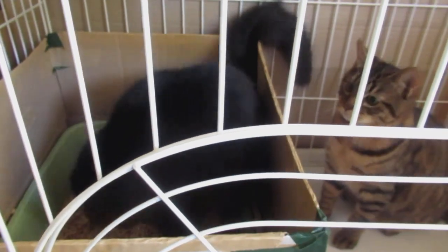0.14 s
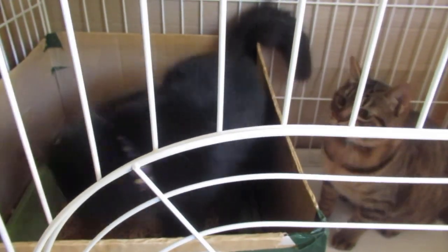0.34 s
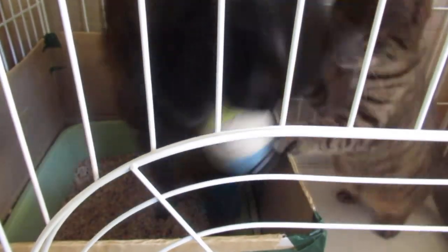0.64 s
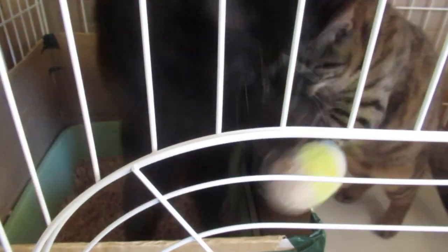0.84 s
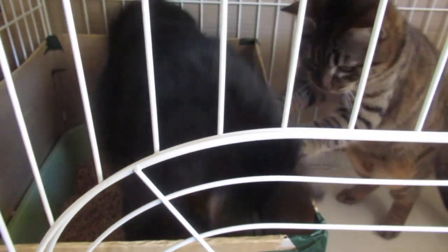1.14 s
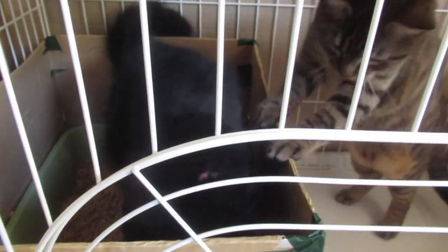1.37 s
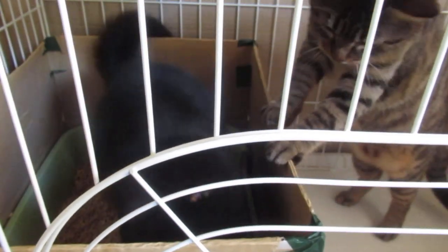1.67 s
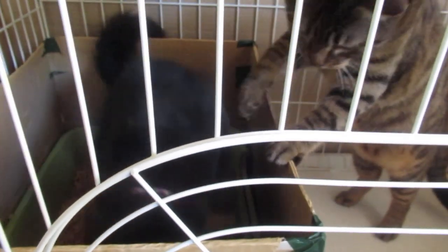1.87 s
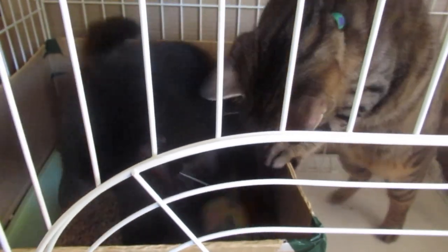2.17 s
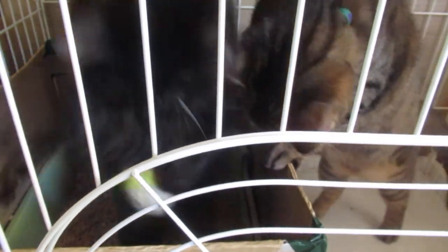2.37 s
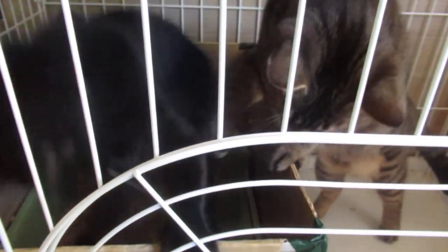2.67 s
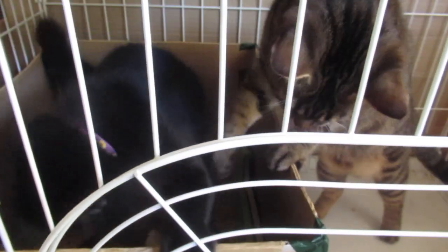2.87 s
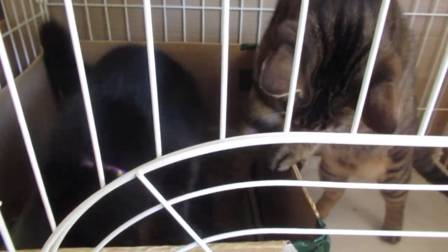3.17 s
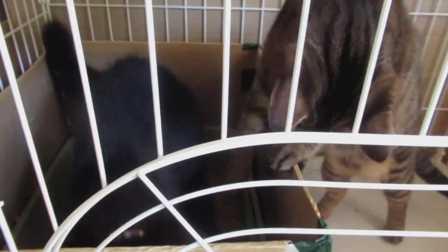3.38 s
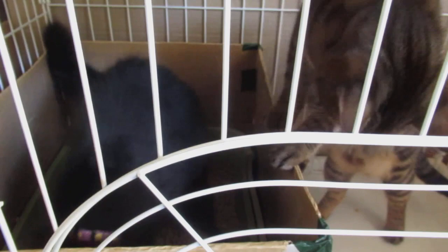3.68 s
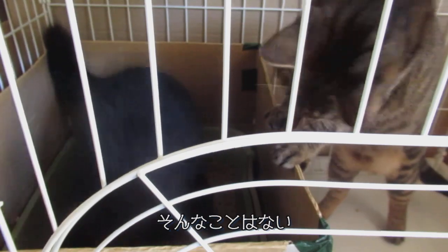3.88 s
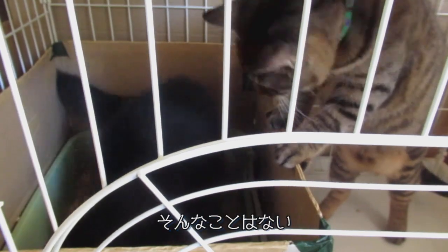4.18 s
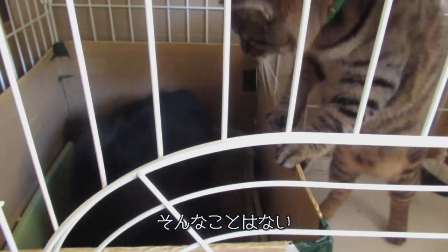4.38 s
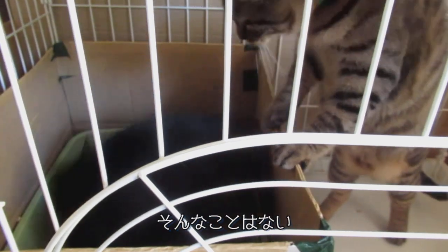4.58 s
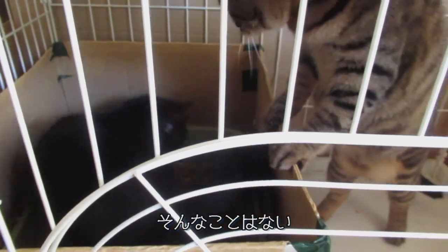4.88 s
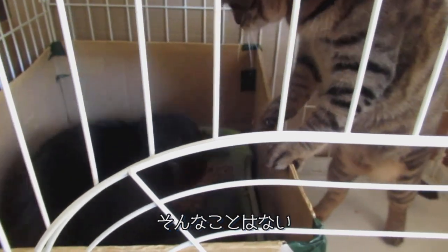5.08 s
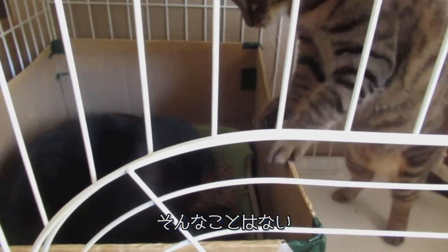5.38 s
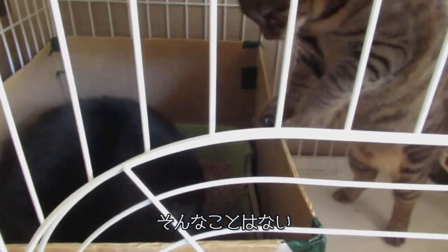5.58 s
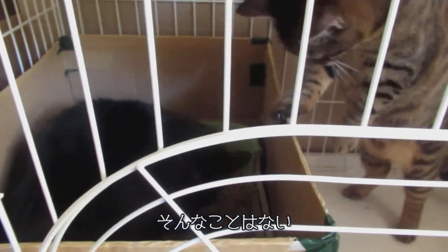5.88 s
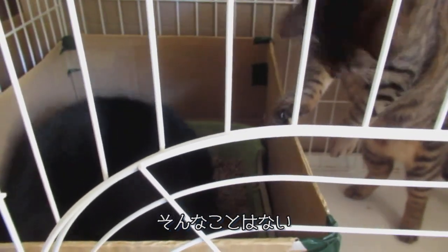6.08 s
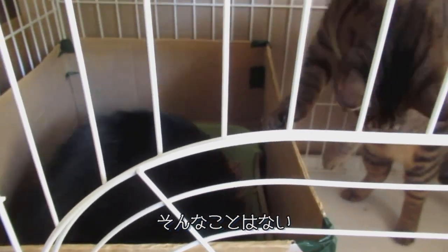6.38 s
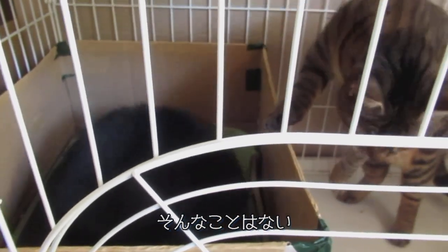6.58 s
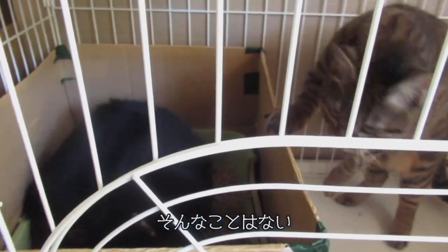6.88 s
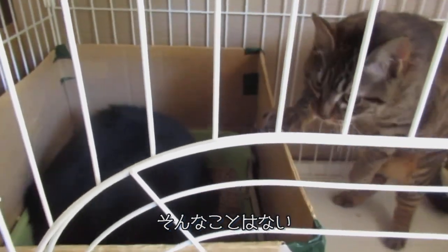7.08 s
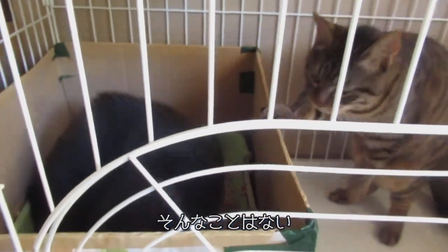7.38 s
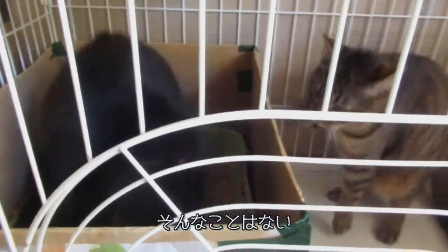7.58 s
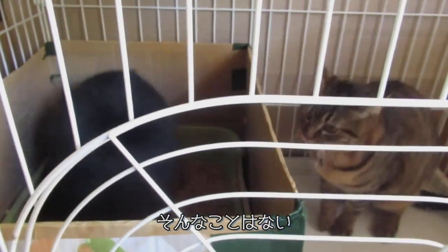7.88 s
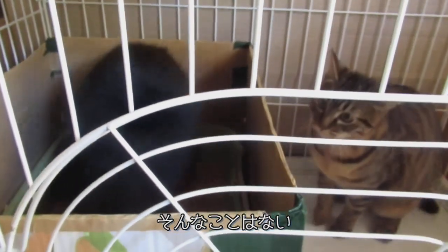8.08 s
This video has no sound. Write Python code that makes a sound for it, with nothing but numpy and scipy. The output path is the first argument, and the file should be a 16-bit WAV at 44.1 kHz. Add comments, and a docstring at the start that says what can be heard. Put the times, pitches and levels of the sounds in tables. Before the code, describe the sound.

A kitten digs in a plastic litter tray inside a cardboard box, heard close in a small, quiet room. For the first second, quick paw strokes rustle and crunch dry pellets, with dull rubbing on cardboard. A soft bump and a single crunch follow around 1.5 seconds. From 2 to 3.2 seconds, a paw or toy ball knocks the box several times with brief, hollow booms among scattered crunches. After a lull, a thump at 4 seconds starts the longest flurry of crunching and scratching, lasting until just after 5 seconds. Soft shuffling follows, then a short scratch from 6.5 to 6.9 seconds. Digging resumes at 7.7 seconds and ends in the loudest, sharpest crunch at about 8.2 seconds. Low room air and a faint appliance hum continue throughout, with barely audible, very high, thin squeaks near 0.3, 2.7 and 6.5 seconds.

```python
"""Crunching, rustling pellets: a kitten digs in a plastic litter tray in a cardboard box, in a quiet room.
Each paw stroke rolls the pellets, hisses over them and rubs the cardboard; pellets caught against the
tray crunch. Now and then a paw or a toy ball bumps the box, which booms briefly.
Behind it: room air, a faint appliance hum and a few thin, very high squeaks."""
import sys
import numpy as np
from scipy import signal
from scipy.fft import rfft, irfft
from scipy.io import wavfile
from scipy.ndimage import uniform_filter1d

SR = 44100
rng = np.random.default_rng(int(sys.argv[2]) if len(sys.argv) > 2 else 0)


def store_wav(level_fs):
    """Save 16-bit WAV to argv[1]."""
    pcm = np.round(np.clip(np.atleast_2d(level_fs), -1, 1) * 32767)
    wavfile.write(sys.argv[1], SR, pcm.T.astype(np.int16))


N = 363384


def amp(db):
    return 10 ** (np.asarray(db) / 20)


def unit_rms(x):
    return x / np.sqrt(np.mean(x ** 2) + 1e-20)


def curve(points, hz):
    """Interpolate (freq_hz, value) points over log frequency."""
    freq_hz, value = np.transpose(points)
    return np.interp(np.log(hz + 1), np.log(freq_hz + 1), value)


def add(mix, start_s, sound):
    part = mix[max(round(start_s * SR), 0):][:len(sound)]
    part += sound[:len(part)]


def bins_hz(size):
    return np.fft.rfftfreq(size, 1 / SR)


def colour(x, gain_db):
    """Minimum-phase filter: rings after its cause, never before."""
    log_gain = np.log(amp(np.maximum(gain_db, -100)))
    mirrored = np.r_[log_gain, log_gain[-2:0:-1]]
    taps = np.fft.ifft(np.exp(np.conj(signal.hilbert(mirrored)))).real
    return signal.oaconvolve(x, taps[:len(log_gain)])[:len(x)]


def hump(hz, centre_hz, width_hz):
    return 1 / (1 + (2 * (hz - centre_hz) / width_hz) ** 2)


def clicks(size, per_s, spread_db):
    """Random impulses, exponentially spread in level."""
    hit = rng.random(size) < per_s / SR
    height = np.minimum(rng.exponential(1, size), 4)
    return hit * rng.choice([-1, 1], size) * amp(spread_db * height)


def room_air(level_db=-55):
    """Steady, bass-heavy noise of a still room."""
    # air spectrum: freq_hz, gain_db
    spectrum = [(15, -17), (28, -10), (42, 4), (62, -8), (110, -1), (150, -5.5), (190, -10.5), (270, -7),
                (420, -6), (700, -16), (1500, -16), (4000, -25.5), (10000, -27.5), (15000, -35.5)]
    white = rfft(rng.standard_normal(N))
    return amp(level_db) * unit_rms(irfft(white * amp(curve(spectrum, bins_hz(N))), N))


def appliance_hum(drone_hz=84, drone_width_hz=7, drone_gain_db=2):
    """Wavering tones of narrow-band noise; the lowest swells and fades."""
    # upper tones: pitch_hz, level_db, width_hz
    tones = [(232, -67.5, 14), (292, -68.5, 26), (636, -82, 35), (1817, -72, 12)]
    # swell of the lowest tone: time_s, relative_db
    swell = [(0, -66), (2.2, -62.5), (2.9, -58), (4.5, -65), (5.7, -64.5), (6.2, -53.5), (7.7, -60),
             (8.24, -71)]
    hz = bins_hz(N)
    white = rfft(rng.standard_normal(N))
    hum = sum(amp(db) * unit_rms(irfft(white * hump(hz, f, width), N)) for f, db, width in tones)
    drone = unit_rms(irfft(white * hump(hz, drone_hz, drone_width_hz), N))
    drone_db = drone_gain_db + np.interp(np.arange(N) / SR, *np.transpose(swell))
    return hum + amp(drone_db) * drone


def squeaks(level_db=-72, sag=0.13, width_hz=350):
    """Thin, fuzzy whistles; each rises and falls in pitch in one arch."""
    # whistles: centre_s, length_s, top_hz
    whistles = [(0.312, .21, 13350), (2.67, 0.16, 13000), (6.43, 0.12, 13650), (6.51, 0.1, 13300)]
    out = np.zeros(N)
    for centre_s, length_s, top_hz in whistles:
        u = np.linspace(-1, 1, int(length_s * SR))
        pitch_hz = top_hz * (1 - sag * np.abs(u) ** 1.5)
        tone = np.sin(2 * np.pi * np.cumsum(pitch_hz) / SR)
        waver = unit_rms(uniform_filter1d(rng.standard_normal(len(u)), int(SR / width_hz)))
        add(out, centre_s - length_s / 2, amp(level_db) * np.sqrt(1 - u ** 2) * waver * tone)
    return out


def room_reverb(x, predelay_s=1 / 120):
    """Small room: a diffuse tail whose treble dies first."""
    # room decay: freq_hz, t60_s
    decay = [(150, 0.2), (700, 0.15), (2000, 0.21), (5000, 0.064), (13000, 0.1)]
    hz, t, reflections = signal.stft(clicks(SR // 2, per_s=3600, spread_db=1), SR, nperseg=256)
    fade = amp(-60 * t / curve(decay, hz)[:, None])
    _, tail = signal.istft(reflections * fade, SR, nperseg=256)
    tail = np.r_[np.zeros(int(predelay_s * SR)), tail]
    return signal.fftconvolve(x, tail / np.linalg.norm(tail))[:N]


def paw_envelopes(rise_share=0.43, swell_power=1.35, shuffle_hiss_db=-10, shuffle_rub_db=-16):
    """Rustle, hiss and rub gains: each stroke swells and falls over slow shuffling."""
    # kitten shifting its weight: time_s, rustle_db
    shuffle = [(0, -57.5), (1.15, -56), (1.85, -62), (2.4, -60.5), (2.85, -53.5), (3.25, -62.5),
               (4.0, -55.5), (4.5, -47), (5.25, -60), (6.3, -58.5), (6.65, -53), (7.1, -59), (8.24, -52.5)]
    # paw strokes: peak_s, length_s, rustle_db, hiss_db, rub_db
    strokes = [(.092, 0.02, -47, -75, -62), (0.294, 0.024, -48, -79, -49), (0.176, 0.024, -34, -55, -46),
               (0.242, 0.015, -33.5, -73, -42), (0.444, 0.024, -44.5, -72, -46),
               (0.531, 0.014, -53, -66, -44.5), (0.613, 0.042, -41, -64, -45),
               (0.668, 0.028, -43.5, -52.5, -39.5), (0.76, 0.03, -46.5, -50, -42),
               (0.84, 0.083, -41.5, -46, -38.5), (0.957, 0.17, -51.5, -66, -55.5),
               (1.48, 0.062, -53, -60, -63), (1.624, 0.039, -49, -48, -45.5),
               (2.16, 0.11, -55.5, -59.5, -57), (2.546, 0.03, -48, -59, -47),
               (2.632, 0.026, -58, -54, -37.5), (2.695, 0.032, -36.5, -56.5, -40),
               (2.76, 0.078, -46, -61, -51), (3.179, 0.019, -42, -46.5, -43),
               (3.202, 0.017, -39.5, -43.5, -48), (4.006, .09, -51, -55, -55),
               (4.085, 0.053, -32, -56, -49), (4.238, 0.042, -30.5, -45, -46),
               (4.323, .05, -39.5, -58, -67), (4.377, .05, -46, -58, -66), (4.466, 0.024, -39, -57, -62),
               (4.594, 0.085, -39.5, -67, -49), (4.751, 0.036, -37.5, -70, -46.5),
               (4.853, 0.059, -39.5, -56, -56), (4.997, 0.068, -39, -56, -66),
               (5.088, 0.013, -38, -67, -66), (5.419, 0.026, -50, -56, -53), (5.772, 0.088, -54, -57, -71),
               (6.037, 0.031, -52, -63, -49), (6.527, 0.024, -38.5, -50.5, -55),
               (6.602, 0.049, -43, -68, -73), (6.795, 0.086, -59, -74, -51.5),
               (6.852, 0.023, -42.5, -50, -49), (6.888, 0.033, -32, -56, -64),
               (7.67, 0.041, -47, -54.5, -50.5), (7.753, 0.038, -34.5, -49.5, -45),
               (7.83, 0.077, -47.5, -65, -49), (7.922, 0.039, -45, -75, -44), (8.02, 0.11, -48, -61.5, -47),
               (8.187, 0.056, -39.5, -50, -67)]
    t = np.arange(0, N + 50, 50) / SR
    shuffle_db = np.interp(t, *np.transpose(shuffle))
    power = amp(shuffle_db + np.c_[[0, shuffle_hiss_db, shuffle_rub_db]]) ** 2
    for peak_s, length_s, *levels_db in strokes:
        reach_s = length_s * np.where(t < peak_s, rise_share, 1 - rise_share)
        swell = np.exp(-np.abs((t - peak_s) / reach_s) ** swell_power)
        power += amp(np.c_[levels_db]) ** 2 * swell
    return [np.interp(np.arange(N) / SR, t, np.sqrt(p)) for p in power]


def cardboard_rub(rub_gain):
    """The kitten slides along the cardboard, which rumbles dully."""
    # cardboard response: freq_hz, gain_db
    spectrum = [(30, -13), (70, -0.5), (130, -3), (200, -2), (300, -1.5), (450, -3), (700, -16),
                (2000, -55), (15000, -97)]
    return rub_gain * unit_rms(colour(rng.standard_normal(N), curve(spectrum, bins_hz(8192))))


def box_bumps(spread_octaves=0.86, rise_s=0.0014, leak_hz=45):
    """Soft blows wake the box modes near their centre; the deepest bass is cut away."""
    # blows: start_s, level_db, centre_hz
    blows = [(0.658, -48, 90), (0.839, -40.5, 100), (1.503, -40, 85), (2.093, -40.5, 380),
             (2.115, -40.5, 94), (2.22, -50, 350), (2.288, -48.5, 280), (2.511, -32, 348),
             (2.517, -30.5, 61.7), (2.624, -38, 57.6), (2.662, -45, 48), (3.2, -37.5, 420),
             (3.212, -52, 85), (4.039, -29, 126), (5.334, -46.5, 151)]
    # cardboard box modes: freq_hz, gain_db, t60_s
    modes = [(42, 7.5, 0.26), (75.6, 1, 0.15), (85.4, 7.5, 0.11), (106.5, 4.5, 0.1), (137, 0.5, 0.11),
             (171, -7, 0.22), (210, -7, 0.033), (249, -6, 0.13), (287, -1, 0.097), (323, 3, 0.062),
             (395, -1, 0.097), (458, 8, 0.061)]
    t, out = np.arange(SR // 2) / SR, np.zeros(N)
    hz, gain_db, t60_s = np.transpose(modes)[:, :, None]
    leak = signal.butter(2, leak_hz, "high", fs=SR)
    for start_s, level_db, centre_hz in blows:
        detune, phase = rng.random((2, len(modes), 1))
        tuned_hz = hz * (1 + 0.04 * (detune - 0.5))
        weight = np.exp(-0.5 * (np.log2(hz / centre_hz) / spread_octaves) ** 2)
        rings = weight * amp(gain_db - 60 * t / t60_s) * np.sin(2 * np.pi * (tuned_hz * t + phase))
        boom = signal.lfilter(*leak, rings.sum(0) * (1 - np.exp(-t / rise_s)))
        onset_rms = np.sqrt(np.mean(boom[:SR // 50] ** 2))
        add(out, start_s, amp(level_db) * boom / onset_rms)
    return out


def tray_db(hz):
    """The plastic tray colours the pellets' sound with its resonances."""
    # peaks and dips: centre_hz, width_hz, gain_db
    resonances = [(270.4, 57, 12.5), (604, 110, 4.5), (826, 340, 2), (1125, 75, 3), (1255, 32, 3),
                  (2070, 320, -2), (2940, 66, -2.5)]
    return sum(db * hump(hz, f, width) for f, width, db in resonances)


def pellet_drag(rustle_gain, hiss_gain, hiss_db=-2, tick_db=-3, slip_db=2):
    """Pellets roll over each other in uneven slips; strays tick against the plastic."""
    # rolling pellets: freq_hz, gain_db
    rustle_eq = [(60, -17), (160, -6), (300, -8), (480, -5), (660, 4), (1000, 1.5), (1600, -1.5),
                 (2800, -7), (4200, -21), (9000, -42), (15000, -49)]
    # paw brushing the pellets: freq_hz, gain_db
    hiss_eq = [(1500, -26), (3000, 1.5), (4500, 0), (8000, -2), (12000, -9), (15000, -16)]
    # stray pellets on plastic: freq_hz, gain_db
    tick_eq = [(300, -25), (1200, 3), (3200, 0.5), (8000, -5), (15000, -12)]
    hz = bins_hz(2048)
    drift = uniform_filter1d(uniform_filter1d(rng.standard_normal(N), 400), 200)
    slips = amp(slip_db * unit_rms(drift))
    rustle = colour(clicks(N, per_s=1700, spread_db=0.5) * slips, curve(rustle_eq, hz) + tray_db(hz))
    hiss = colour(clicks(N, per_s=1700, spread_db=-1) * slips, curve(hiss_eq, hz))
    ticks = colour(clicks(N, per_s=170, spread_db=2.5), curve(tick_eq, hz))
    scratch = amp(hiss_db) * unit_rms(hiss) + amp(tick_db) * unit_rms(ticks)
    return rustle_gain * unit_rms(rustle) + hiss_gain * scratch


def pellet_cracks(lead_s, crumble_s, build_s=0.00074, lead_db=-6, snap=0.12, echo_db=-7, t60_s=0.091):
    """Pellets give way until one snaps; the rest crumble, and the box walls scatter the sound."""
    t = np.arange(SR // 5) / SR - lead_s
    after_s = np.maximum(t, 0)
    load = np.where(t < 0, amp(lead_db) * np.exp(-np.abs(t) / build_s), np.exp(-after_s / crumble_s))
    cracks = clicks(len(t), per_s=5000, spread_db=3.5) * load
    cracks /= np.linalg.norm(cracks) + 1e-9
    cracks[int(lead_s * SR)] += snap
    echo_envelope = amp(-60 * after_s / t60_s) * (1 - np.exp(-after_s / 0.00053))
    echo = rng.standard_normal(len(t)) * echo_envelope
    return cracks / np.linalg.norm(cracks) + amp(echo_db) * echo / np.linalg.norm(echo)


def struck_spot_db(hz, ring_hz, treble_db, ring_db=6.5, width_share=0.38):
    """Response of one spot on the tray: the lower it rings, the more hollow body it has."""
    body_db = 3 - 7.5 * np.log2(ring_hz / 1210)
    # freq_hz, gain_db
    shape = [(50, body_db - 24), (190, body_db - 23.5), (480, body_db - 6.5), (640, body_db - 0.7),
             (1100, -0.71), (2400, 0.23),
             (4600, 0.34 * treble_db), (10000, treble_db), (15000, 2.3 * treble_db - 3)]
    return curve(shape, hz) + tray_db(hz) + ring_db * hump(hz, ring_hz, width_share * ring_hz)


def pellet_crunches(lead_s=0.012):
    """Flurries of digging crush pellets against the tray, which rings."""
    # crunches: snap_s, level_db, ring_hz, treble_db, crumble_s
    crunches = [(.147, -39, 1400, -11, 0.0032), (.156, -37.5, 890, -17, 0.0069),
                (.203, -33.5, 1230, -35, 0.0077), (.677, -48, 454, -6, 0.0031),
                (.7005, -30, 1390, -13.5, 0.0032), (.811, -30, 1190, -27, 0.0075),
                (0.826, -30.5, 1780, -33, 0.02), (0.863, -27.5, 3400, -10, 0.0056),
                (0.927, -30.5, 3440, -24.5, 0.0093), (1.622, -26, 2440, -13.5, 0.0049),
                (2.095, -43, 403, -71, 0.0025), (2.508, -30, 1160, -10.5, 0.0041),
                (2.53, -37.5, 970, -16, 0.0025), (2.615, -34, 1220, -11.5, 0.0074),
                (2.682, -38, 610, -41, 0.0048), (2.911, -35, 1670, -6.5, 0.0033),
                (3.2, -34, 1110, -50, 0.0053), (4.0558, -24.5, 1310, -5.5, .0034),
                (4.071, -27.5, 790, -24, 0.0067), (4.083, -23.5, 1660, -21, 0.0087),
                (4.0933, -18, 1060, -17.5, 0.0013), (4.108, -27.5, 1870, -7, 0.0071),
                (4.148, -36, 1700, -13, 0.0017), (4.157, -34, 2130, -12, 0.0049),
                (4.2119, -21.5, 1140, -41, 0.0094), (4.229, -23.5, 2400, -9.5, 0.0021),
                (4.258, -30, 880, -6, 0.0057), (4.273, -21, 790, -16.5, 0.0012),
                (4.318, -34.5, 1400, -15, 0.0032), (4.33, -37, 1110, -19, 0.0086),
                (4.367, -33, 2500, -8, 0.0069), (4.381, -33.5, 1450, -18, 0.025),
                (4.417, -38.5, 1310, -13, 0.0037), (4.439, -38, 1200, -19, .006),
                (4.501, -41.5, 1520, -12, .006), (4.56, -28.5, 4520, -11.5, .004),
                (4.577, -32, 3340, -16, 0.019), (4.599, -33, 3000, -20, 0.0064),
                (4.621, -31, 2230, -16, 0.0055), (4.663, -37.5, 1150, -37, 0.0022),
                (4.675, -36.5, 770, -39, 0.0047), (4.707, -34.5, 2600, -13, 0.0036),
                (4.73, -30.5, 1330, -26, 0.0085), (4.821, -25.5, 2180, -51, 0.0085),
                (4.857, -34, 1760, -18.5, 0.0089), (4.959, -26, 1500, -40, 0.0081),
                (4.982, -26.5, 1860, -21, 0.003), (5.01, -37, 1220, -5, .005),
                (5.031, -33.5, 1790, -22, 0.0035), (5.079, -32, 1080, -24.5, 0.0069),
                (5.128, -39, 756, -18, 0.016), (5.145, -41, 1500, -18, 0.0034),
                (5.336, -47.5, 510, -22, 0.007), (5.501, -41.5, 930, -48, 0.0051),
                (5.508, -38, 1320, -37, 0.0045), (6.591, -34, 1200, -14, 0.007),
                (6.657, -37, 890, -22, 0.0017), (6.666, -40.5, 1120, -18, 0.0028),
                (6.697, -45.5, 920, -7, .003), (6.883, -38, 810, -15, 0.012), (7.7, -43, 1610, -8, 0.0037),
                (7.78, -38.5, 820, -13, 0.01), (7.86, -44, 1300, -19, 0.0018),
                (7.949, -35.5, 795, -26, 0.0034), (7.955, -27, 1020, -24, 0.0038),
                (8.154, -39.5, 1680, -15, 0.0026), (8.174, -33, 1400, -24, 0.0053),
                (8.181, -27.5, 1600, -26, 0.0056), (8.187, -24, 1650, -17.5, 0.0041),
                (8.208, -33, 1300, -46, 0.0054), (8.219, -29, 875, -33, 0.0049),
                (8.233, -17.5, 2950, -6, 0.0019), (8.2375, -13.5, 3270, -30, 0.0017)]
    hz, out = bins_hz(2048), np.zeros(N)
    for snap_s, level_db, ring_hz, treble_db, crumble_s in crunches:
        crunch = colour(pellet_cracks(lead_s, crumble_s), struck_spot_db(hz, ring_hz, treble_db))
        burst_rms = np.sqrt(np.sum(crunch ** 2) / (SR / 70))  # energy taken over 1/70 s
        add(out, snap_s - lead_s, amp(level_db) * crunch / burst_rms)
    return out


def scene(reverb_db=-15):
    """Mono mix; only the kitten's sounds feed the reverb."""
    rustle_gain, hiss_gain, rub_gain = paw_envelopes()
    pellets = pellet_crunches() + pellet_drag(rustle_gain, hiss_gain)
    kitten = pellets + box_bumps() + cardboard_rub(rub_gain)
    reverb = amp(reverb_db) * room_reverb(kitten)
    return (kitten + reverb + squeaks() + room_air() + appliance_hum())[None]


def record(dry, ceiling=0.53, cutoff_hz=15200):
    """Soft clip, then low-pass."""
    rounded = ceiling * np.tanh(dry / ceiling)
    lowpass = signal.firwin(255, cutoff_hz, window=("kaiser", 8), fs=SR)
    return signal.oaconvolve(rounded, lowpass[None], "same")


dry = scene()
out = record(dry)
store_wav(out)
```